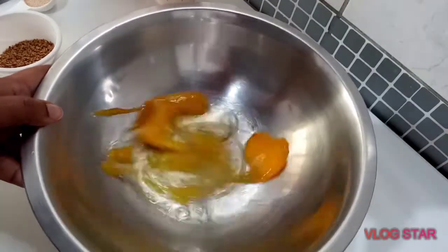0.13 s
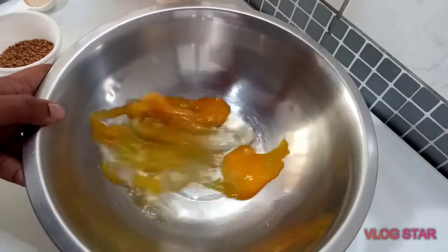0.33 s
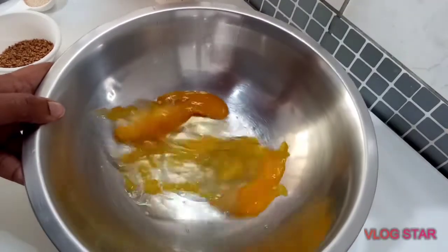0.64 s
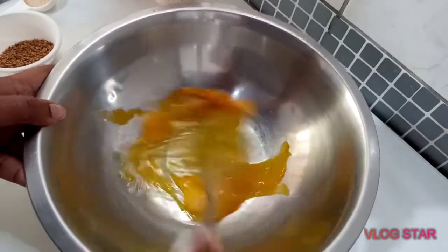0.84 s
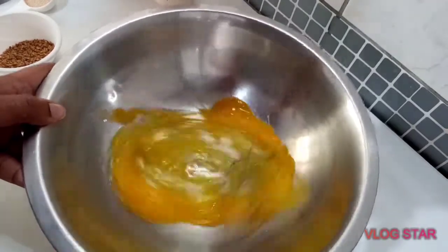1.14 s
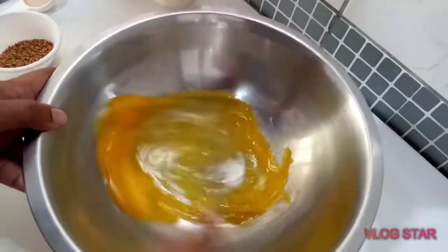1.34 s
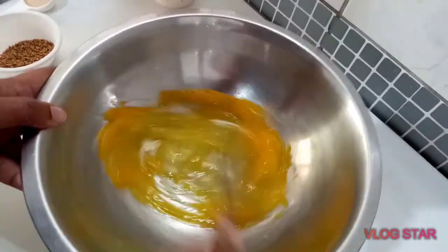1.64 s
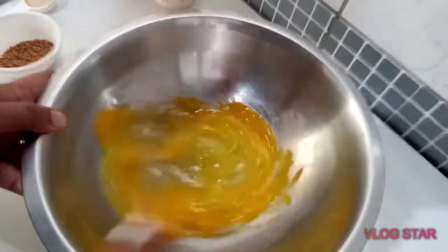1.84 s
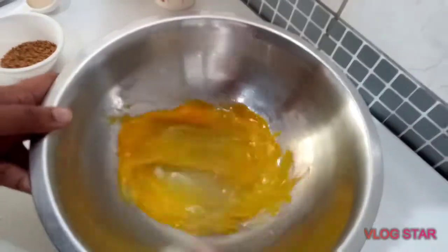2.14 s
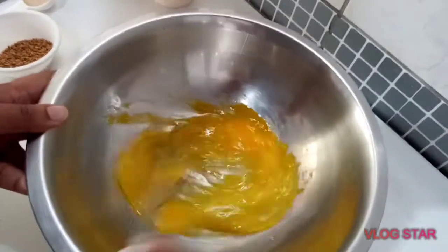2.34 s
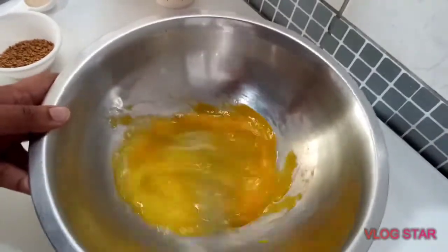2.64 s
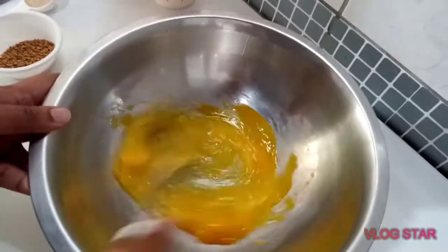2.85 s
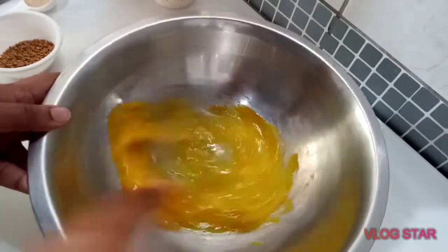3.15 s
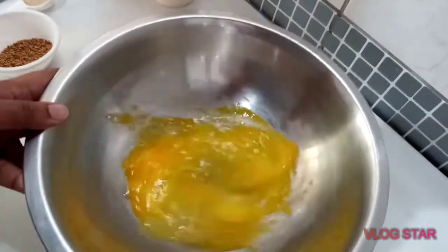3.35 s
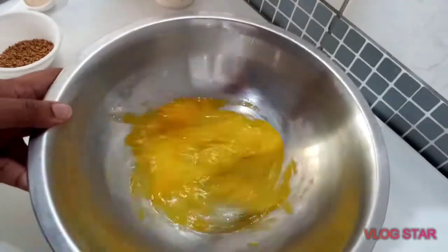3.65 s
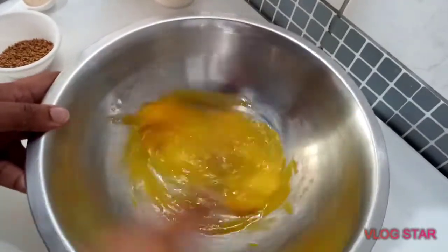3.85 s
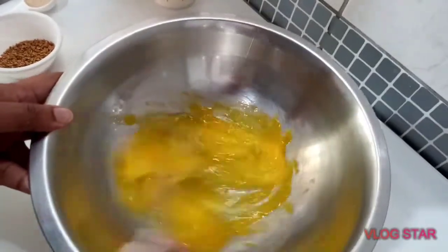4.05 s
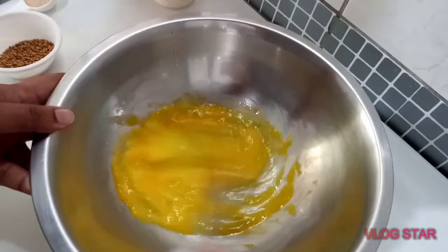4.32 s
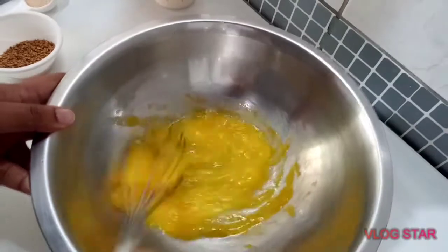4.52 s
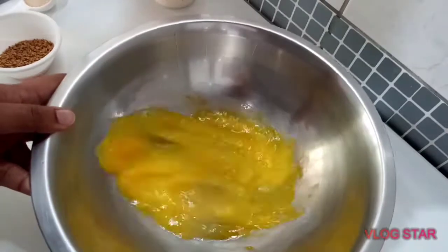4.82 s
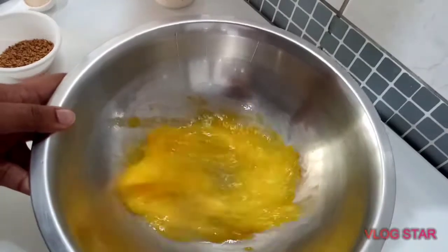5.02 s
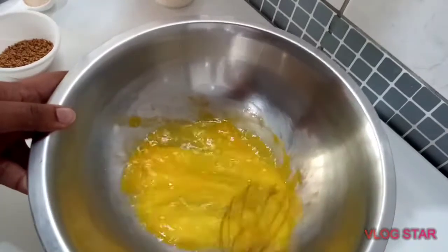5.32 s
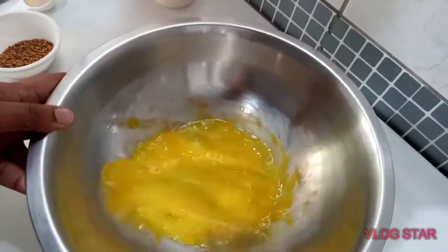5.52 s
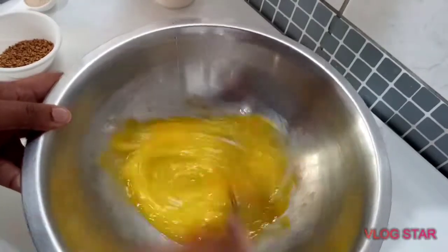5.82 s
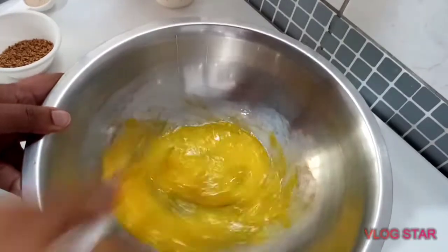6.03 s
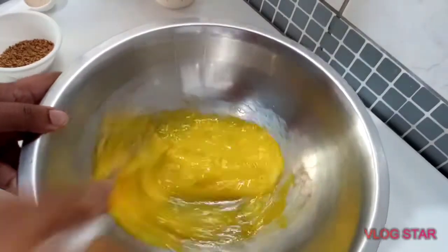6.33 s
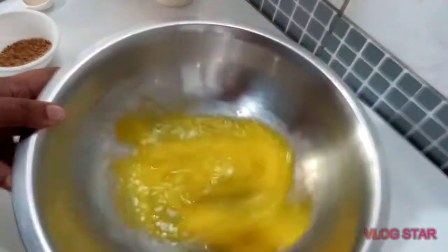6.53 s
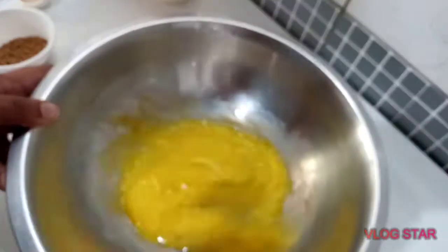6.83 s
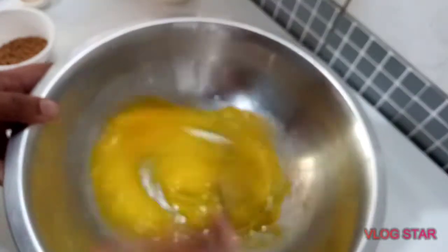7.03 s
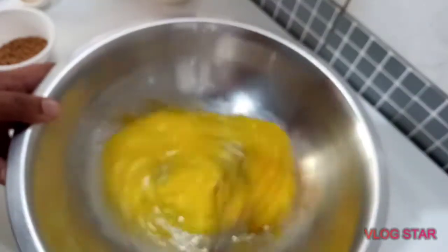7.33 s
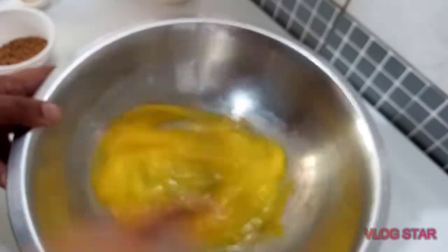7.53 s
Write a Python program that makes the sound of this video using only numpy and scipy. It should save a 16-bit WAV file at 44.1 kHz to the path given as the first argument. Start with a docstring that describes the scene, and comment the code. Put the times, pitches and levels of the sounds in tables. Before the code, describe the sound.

Quick, continuous whisking of eggs in a metal bowl, the wires clicking and scraping against its ringing wall.

```python
"""A wire whisk circles fast in a steel bowl of egg yolk, held by one hand on a kitchen counter.
The wires land on the wall in clattering bunches and drag along it; both ring the bowl's few low modes
and its dense, quickly damped high ones. Soft thumps press the bottom, and two round notes swell as
a wire slides off. Air pockets pop in the yolk, and the kitchen answers briefly."""
import sys
import numpy as np
from scipy import signal
from scipy.fft import rfft, irfft, next_fast_len
from scipy.io import wavfile

SR = 44100
rng = np.random.default_rng(int(sys.argv[2]) if len(sys.argv) > 2 else 0)


def digitize_waveform(pressure):
    """Quantize a signal to 16-bit integers and store it at the path in sys.argv[1].

    Rows of a 2-D input are taken as channels; values are limited to [-1, 1].
    """
    field = np.atleast_2d(pressure).T
    bounded = np.clip(field, -1, 1)
    quanta = np.round(bounded * 32767).astype(np.int16)
    wavfile.write(sys.argv[1], SR, quanta)


N = 338247

# Wires landing on the wall; wall_db and belly_db are relative to level_db.
# start_s, level_db, wall_db, belly_db, chatter_t60_s
LANDINGS = [(0.117, -19, -22, -25, 0.056), (0.1206, -4, -32, -11, 0.11), (0.219, -14, -40.0, -10, 0.11),
            (0.2528, -23, -34, -11, 0.05), (0.316, -13, -37, -28, 0.04), (0.34, -13.5, -31.0, -41, 0.05),
            (0.3717, -16, -21, -5.5, 0.033), (0.423, -13.5, -22, -8, 0.077),
            (0.4817, -11.5, -26, -12, 0.068), (0.5582, -7.5, -33, -24, 0.14),
            (0.6092, -7.5, -49, -25, 0.04), (0.705, -21, -32, -6, 0.075), (0.791, -11, -23.5, -16, 0.26),
            (0.872, -9, -31, -13.5, 0.14), (0.9169, -19, -24, -5, 0.19), (1.045, -5.5, -23.5, -13.5, 0.18),
            (1.1251, -3.5, -26, -20, 0.1), (1.1776, -12, -27, -10.5, 0.11), (1.2074, -10, -23, -17, 0.052),
            (1.253, -8, -26, -16, 0.077), (1.3, -3.0, -19.5, -18, 0.084), (1.31, -9, -14.5, -4, 0.12),
            (1.3969, -4, -27.5, -12, 0.068), (1.4426, -12.5, -37, -10, 0.11),
            (1.5711, -3, -24, -16.5, 0.24), (1.6036, -25, -32, -15, 0.046), (1.6702, -8, -34, -10.5, 0.15),
            (1.7385, -15, -25, -15.0, 0.12), (1.798, -15, -23, -14, 0.13), (1.8553, -6, -20.5, -11, 0.18),
            (1.8767, -14.5, -20, -29, 0.1), (1.933, -8.5, -18.5, -25, 0.035),
            (2.3188, -8.5, -31, -11.5, 0.11), (2.3766, -9, -23.5, -25, 0.065), (2.628, -14, -17, -28, 0.14),
            (2.8577, -6, -20, -16, 0.17), (2.909, -11.5, -28, -19, 0.044), (2.9322, -16.5, -18, -10, 0.04),
            (2.967, -11.5, -26.0, -14, 0.12), (2.989, -17, -25, -8, 0.068),
            (3.1267, -4.5, -20, -23.0, 0.13), (3.1405, -9, -14, -9.5, 0.071), (3.283, -11.5, -25, -27, 0.1),
            (3.3006, -9, -43, -38, 0.056), (3.4046, -17.5, -19, -17, 0.079),
            (3.4677, -5.5, -20.5, -19, 0.07), (3.497, -6, -41, -32, 0.02),
            (3.588, -16.5, -19.5, -29, 0.089), (3.632, -17, -27, -39, 0.1), (3.6684, -17, -17, -30, 0.068),
            (3.793, -6.5, -18.5, -13.5, 0.15), (3.808, -12, -16.5, -9, 0.12), (3.843, -16, -28, -8, 0.057),
            (3.879, -17, -15, -23, 0.054), (3.911, -12, -23, -13, 0.078), (3.9286, -12, -22.5, -26, 0.046),
            (3.9972, -23.5, -14.5, -6, 0.21), (4.0903, -14, -20, -9, 0.1), (4.105, -12.5, -24, -15, 0.074),
            (4.2994, -14, -19.5, -11, 0.18), (4.333, -22, -28, -3, 0.025),
            (4.3546, -18.5, -15.5, -5, 0.068), (4.3892, -15, -20, -8, 0.094), (4.543, -9, -15, -13, 0.066),
            (4.556, -14, -13, -22, 0.14), (4.671, -17, -29, -10, 0.1), (4.701, -23, -36, -17, 0.043),
            (4.7962, -9, -23.5, -15, 0.16), (4.836, -8.5, -40.0, -21, 0.015),
            (4.943, -17.5, -18, -5.5, 0.088), (4.97, -11.5, -16, -5.5, 0.028),
            (5.0933, -8, -47, -34, 0.021), (5.1104, -14.5, -21, -10.5, 0.52), (5.2172, -18, -14, -6, 0.11),
            (5.319, -31, -1.5, -3, 0.04), (5.332, -18, -24, -10, 0.33), (5.369, -21.5, -6.5, -4, 0.11),
            (5.541, -21, -27, -33, 0.042), (5.607, -17.5, -10.5, -8.5, 0.12),
            (5.6895, -20, -12.5, -6, 0.22), (5.714, -14.5, -16, -13.5, 0.26),
            (5.8215, -12.5, -18, -18, 0.12), (5.837, -28, -37, -6, 0.06), (5.8828, -17, -22, -11, 0.17),
            (5.904, -10, -32, -24, 0.023), (6.0261, -9.5, -19, -13, 0.17),
            (6.0705, -13.5, -25.0, -29, 0.11), (6.132, -29, -2, -23.0, 0.044),
            (6.143, -8, -21.5, -32, 0.12), (6.2885, -12.5, -29.0, -17.5, 0.21),
            (6.3323, -12, -18, -11.5, 0.13), (6.339, -18, -16.5, -17, 0.38),
            (6.4428, -5.5, -19.5, -8, 0.087), (6.481, -20, -12, -6, 0.23), (6.511, -23, -26, -17, 0.046),
            (6.59, -19, -29, -19, 0.06), (6.643, -7, -16, -10.5, 0.083), (6.653, -11.5, -25, -17, 0.13),
            (6.679, -13.5, -16.5, -18, 0.092), (6.7541, -8, -23.5, -5.5, 0.17),
            (6.9, -17.5, -16, -7.5, 0.14), (6.947, -6, -25.5, -24, 0.058), (6.9585, -10, -19.5, -11, 0.25),
            (7.052, -14, -17.5, -6, 0.18), (7.179, -25.5, -9.5, -2, 0.085),
            (7.228, -15.5, -16.5, -14, 0.16), (7.241, -10.5, -17, -13, 0.15),
            (7.311, -15, -23.5, -6, 0.098), (7.337, -19.5, -17.5, -6.5, 0.86),
            (7.506, -10.5, -17, -10.5, 0.12), (7.582, -8, -19, -9, 0.13), (7.6152, -15, -25, -10, 0.16)]
CLATTER_DB = -3.5   # how hard a landing drives the high and mid modes


def from_db(db):
    """Decibels to gain."""
    return 10 ** (np.asarray(db) / 20)


def rms_one(x):
    """Scales to unit rms."""
    return x / np.sqrt(np.mean(x ** 2) + 1e-20)


def drift(rate_hz):
    """Smooth random motion of rms 1, changing about rate_hz times a second."""
    r = np.exp(-2 * np.pi * rate_hz / SR)
    return rms_one(signal.lfilter([1], [1, -2 * r, r * r], rng.standard_normal(N + SR))[SR:])


def ring(force, hz, t60):
    """One mode; white force of rms 1 rings at about rms 1."""
    r, w = from_db(-60 / (t60 * SR)), 2 * np.pi * min(hz, .45 * SR) / SR
    return signal.lfilter([2 * np.sqrt(1 - r) * np.sin(w)], [1, -2 * r * np.cos(w), r * r], force + 1e-18)


def pass_band(hz, side, x):
    """Keeps what lies on the high or low side of hz."""
    return signal.sosfilt(signal.butter(4, hz, side, fs=SR, output="sos"), x)


def grains(per_s, spread_db):
    """Random contacts, a few much stronger than the rest; rms 1."""
    sizes = from_db(spread_db * np.minimum(rng.exponential(1, N), 5)) * rng.choice([-1, 1], N)
    return rms_one(sizes * (rng.random(N) < per_s / SR))


def strikes(times, levels_db, crack_t60, chatter_db, chatter_t60, swell_s=0.0009):
    """Envelope of each blow: a short crack, then the other wires chattering down."""
    out = np.zeros(N)
    for start_s, level_db, t60 in np.broadcast(times, levels_db, chatter_t60):
        i = round(start_s * SR)
        t = np.arange(min(SR // 2, N - i)) / SR
        fall = from_db(-60 * t / crack_t60) + from_db(chatter_db - 60 * t / t60)
        out[i:i + len(t)] += from_db(level_db) * fall * np.minimum(t / swell_s, 1)
    return out


def ticks(times, levels_db, boost_db=7):
    """One dry impulse each time the whisk meets the steel."""
    out = np.zeros(N)
    out[np.round(times * SR).astype(int)] = from_db(levels_db + boost_db)
    return out


def bowl(modes, wires, spot_db, dwell_s):
    """Three wires share the modes; the contact wanders, so each mode is driven now more, now less."""
    spot = np.cumsum(rng.random(N) < 1 / (dwell_s * SR))
    strength = from_db(spot_db * rng.standard_normal((N // 100, len(modes))))
    total = np.sqrt(sum(from_db(2 * level_db) for hz, level_db, t60 in modes))
    return sum(ring(wires[k % 3] * strength[spot, k], hz, t60) * from_db(level_db) * (-1) ** (k // 3)
               for k, (hz, level_db, t60) in enumerate(modes)) / total


def kitchen(x, t60_s=0.57):
    """Ten feedback delays between tiled walls; the treble dies first."""
    size = next_fast_len(N + SR)
    hz = np.arange(size // 2 + 1) * SR / size
    t60 = t60_s / (1 + hz / 9000)
    lags_s = rng.uniform(.011, 0.037, 10)
    loops = [from_db(-60 * lag / t60) * np.exp(-2j * np.pi * hz * lag) for lag in lags_s]
    response = sum((-1) ** k * loop / (1 - loop) for k, loop in enumerate(loops))
    return irfft(rfft(x, size) * response, size)[:N]


def yolk_pops(scrape):
    """Drag and landings squash the yolk: small pockets burst in clusters, with a short ring each."""
    start_s, level_db, _, belly_db, _ = np.transpose(LANDINGS)
    squeeze = scrape + strikes(start_s, level_db + belly_db, 0.08, -8.5, 0.2, swell_s=0.006)
    pitches_hz, pocket = np.geomspace(2000, 3300, 12), rng.integers(0, 12, N)
    bursts = grains(per_s=180, spread_db=2.6) * from_db(1.5 * drift(7))
    pops = sum(ring(bursts * (pocket == k), hz, 24 / hz) for k, hz in enumerate(pitches_hz))
    return squeeze * rms_one(pops)


def plops(swell_cycles=0.4):
    """Bursting pockets ring as dying sines that wobble in the thick yolk; some climb as they close."""
    # Air pockets in the yolk: start_s, pitch_hz, level_db, rise_octaves
    pockets = [(.051, 2650, -26, 0), (.164, 3000, -23, .2), (.224, 2480, -20, 0), (.3712, 1040, -18, .45),
               (.393, 3750, -23.5, 0), (.684, 2010, -23, .05), (1.891, 1770, -26, 0), (2.712, 2250, -19, 0),
               (3.225, 2480, -18, .05), (3.717, 2100, -27, 0), (4.31, 2300, -23, 0), (4.377, 2450, -23, 0),
               (4.843, 2350, -24, 0), (4.877, 2200, -26, 0), (4.917, 2260, -23, .05),
               (5.284, 1386, -23, 1.7), (5.445, 2960, -27, 0), (6.418, 1290, -28, .3),
               (7.075, 3920, -26, .3)]
    out, wobble = np.zeros(N), drift(450)
    for start_s, hz, level_db, rise in pockets:
        t60 = 0.1 * (1000 / hz) ** 1.8   # smaller pockets die faster
        t, i = np.arange(round(t60 * SR)) / SR, round(start_s * SR)
        octaves = rise * t / t60 + .04 * wobble[i:i + len(t)]
        phase = 2 * np.pi * np.cumsum(hz * 2 ** octaves) / SR
        envelope = from_db(level_db - 60 * t / t60) * np.minimum(t * hz / swell_cycles, 1)
        out[i:i + len(t)] += envelope * np.sin(phase)
    return out


def hollow_notes(swell_s=0.01):
    """A wire slides off the wall and lets one round note swell and die."""
    # Round notes near the wall's main pitch: start_s, pitch_hz, level_db
    notes = [(2.133, 970, -23.5), (2.788, 956, -21)]
    out, t = np.zeros(N), np.arange(SR // 10) / SR
    envelope = (t / swell_s * np.exp(1 - t / swell_s)) ** 1.8
    for start_s, hz, level_db in notes:
        i = round(start_s * SR)
        out[i:i + len(t)] += from_db(level_db) * envelope * np.sin(2 * np.pi * hz * t)
    return out


def drag(lift_s=0.062):
    """Slow pressure of the hand, eased more and more before each new touch."""
    # Pressure of the dragging wires: time_s, level_db
    pressure = [(0, -27.5), (.06, -37), (.47, -34.5), (.9, -39), (1.1, -34.5), (1.5, -36), (1.8, -35),
                (2.4, -37), (2.95, -35.5), (3.37, -37), (3.9, -35.5), (4.4, -38), (5.0, -37.5),
                (5.45, -38.5), (6.1, -39), (6.8, -39.5), (7.32, -37.5), (7.57, -40.5), (7.67, -31)]
    # The wires ease off the steel, then touch again at once: touch_s, depth_db
    lifts = [(1.666, 12), (2.68, 8), (3.585, 6.5), (4.354, 12), (5.092, 9), (5.318, 13), (5.542, 9),
             (5.82, 15), (6.443, 12), (7.05, 4)]
    t = np.arange(N) / SR
    eased_db = sum(depth_db * np.clip(1 - (touch_s - t) / lift_s, 0, 1) * (t < touch_s)
                   for touch_s, depth_db in lifts)
    return from_db(np.interp(t, *np.transpose(pressure)) - eased_db)


def bottom_thumps(slips, scrape, knocks):
    """The bottom thumps when the whisk presses it, and hums under the drag and, in part, the landings."""
    # Low modes of the bowl's bottom: pitch_hz, level_db, t60_s
    modes = [(113, -19.5, 0.52), (176.5, 0, 0.4), (205, -5, 0.15), (255, 10, 0.17)]
    # Soft presses, about one a turn: start_s, level_db
    thumps = [(0.122, -28), (0.338, -31.5), (0.555, -32), (1.253, -33.5), (1.571, -32), (1.929, -38),
              (2.065, -38), (2.625, -49), (3.673, -40), (3.994, -36.5), (4.317, -33.5), (4.633, -38.5),
              (4.796, -36), (5.324, -39), (5.37, -31), (5.712, -32.5), (6.144, -36.5), (6.442, -29.5),
              (6.757, -32), (7.055, -34), (7.505, -43.5), (7.581, -34.5)]
    push = from_db(16) * ticks(*np.transpose(thumps))
    rumble = from_db(-50.5) * pass_band(235, "low", slips) * rms_one(scrape + 0.13 * knocks)
    return bowl(modes, push + rumble, spot_db=1.5, dwell_s=0.08)


def wall_ring(contacts, slips, scrape):
    """The steel wall rings at each landing and sings faintly under the drag."""
    # Low modes of the wall: pitch_hz, level_db, t60_s
    modes = [(370, -14, 0.02), (487.3, -17, 0.12), (572.3, -8.5, 0.2), (689.5, -4, 0.09), (726, -1, 0.19),
             (943, -4, 0.1), (966, -1, 0.13), (998, 0, 0.1), (1035, -4, 0.08), (1215, -11, 0.019)]
    start_s, level_db, wall_db, _, t60 = np.transpose(LANDINGS)
    blows = strikes(start_s, level_db + wall_db + 2, crack_t60=0.015, chatter_db=-3.5, chatter_t60=t60)
    rubbed = from_db(-14) * pass_band(560, "high", slips) * scrape
    return bowl(modes, contacts * blows + rubbed, spot_db=2.5, dwell_s=0.05)


def belly_ring(contacts):
    """Landings alone knock a short midrange ring out of the bowl's belly."""
    # Mid modes of the bowl: pitch_hz, level_db, t60_s
    modes = [(1690, -0.5, 0.023), (2237, -2, 0.03), (2870, -4, 0.0044), (3444, 0, 0.0096)]
    start_s, level_db, _, belly_db, t60 = np.transpose(LANDINGS)
    drive_db = level_db + belly_db + CLATTER_DB
    blows = strikes(start_s, drive_db, crack_t60=0.012, chatter_db=-12, chatter_t60=t60)
    return bowl(modes, contacts * blows, spot_db=2.2, dwell_s=.015)


def wire_clatter(contacts, slips, scrape, knocks, count=60):
    """Wires tick, chatter and scrape on the thin shell's dense high modes, damped by yolk and hand."""
    # Tone colour of the high modes, as power per hertz: pitch_hz, level_db
    colour = [(1300, -7.5), (1910, -8), (2220, -7), (2520, -7.5), (4000, -4.5), (8060, 5), (11500, -15),
              (15500, -10.5)]
    hz = np.linspace(np.sqrt(600), np.sqrt(15900), count) ** 2   # ever more modes per octave
    hz *= 1 + .003 * rng.standard_normal(count)
    colour_hz, colour_db = np.transpose(colour)
    mode_db = np.interp(np.log(hz), np.log(colour_hz), colour_db) + 5 * np.log10(hz)
    modes = list(zip(hz, mode_db, 2.358 / hz ** 0.81))   # higher modes die sooner
    start_s, level_db, *_ = np.transpose(LANDINGS)
    struck = contacts * knocks + ticks(start_s + 0.00045, level_db + CLATTER_DB)
    rubbed = from_db(6.5) * slips * scrape
    return bowl(modes, struck + rubbed, spot_db=3.5, dwell_s=0.011)


def scene():
    """Landings, thumps and drag drive the bowl; the yolk pops, and all of it sounds in the kitchen."""
    scrape = drag()
    start_s, level_db, _, _, t60 = np.transpose(LANDINGS)
    knocks = strikes(start_s, level_db + CLATTER_DB, crack_t60=0.0087, chatter_db=-7, chatter_t60=t60)
    contacts = np.array([grains(per_s=9000, spread_db=2.5) for wire in range(3)])
    clumps = from_db(.4 * drift(18) + 1.2 * drift(80))   # stick and slip comes in clumps
    slips = np.array([grains(per_s=14000, spread_db=1.2) for wire in range(3)]) * clumps
    clatter = wire_clatter(contacts, slips, scrape, knocks)
    wall = wall_ring(contacts, slips, scrape)
    shell = pass_band(456, "high", clatter + belly_ring(contacts))   # the clatter and mid ring carry little below about 450 Hz
    bottom = bottom_thumps(slips, scrape, knocks)
    direct = shell + wall + bottom + plops() + hollow_notes() + from_db(-12) * yolk_pops(scrape)
    return (direct + from_db(-21) * kitchen(direct))[None]


def record(dry):
    """A small microphone rounds the peaks, loses the bass, adds a faint hiss and cuts the top."""
    rounded = .5 * np.tanh(dry / .5)
    thin = signal.sosfilt(signal.butter(6, 140, "high", fs=SR, output="sos"), rounded)
    hiss = from_db(-53) * signal.lfilter([1, -.8], [1], rng.standard_normal(dry.shape))
    return signal.sosfilt(signal.ellip(10, .5, 70, 15750, fs=SR, output="sos"), thin + hiss)


dry = scene()
out = record(dry)
digitize_waveform(out)
```